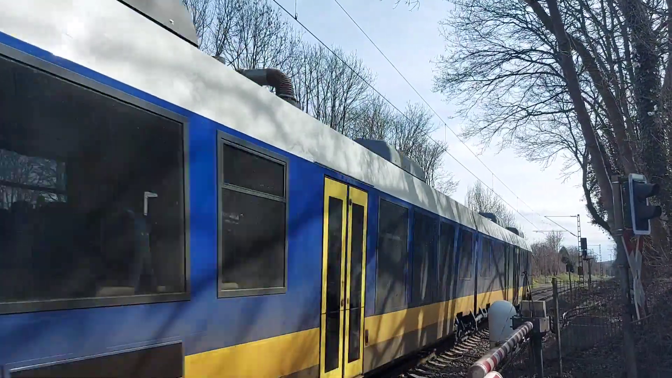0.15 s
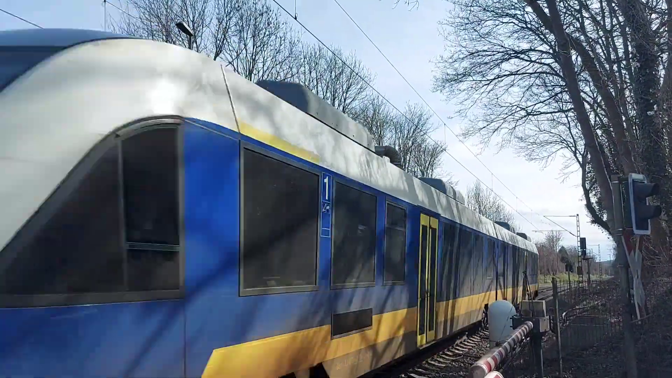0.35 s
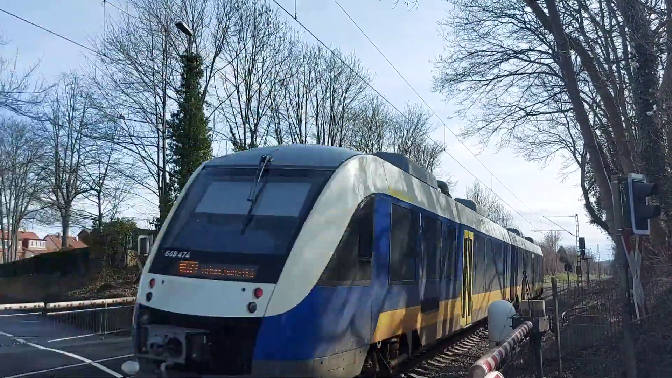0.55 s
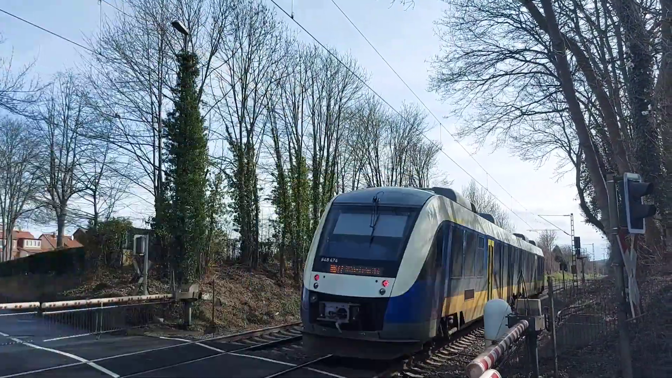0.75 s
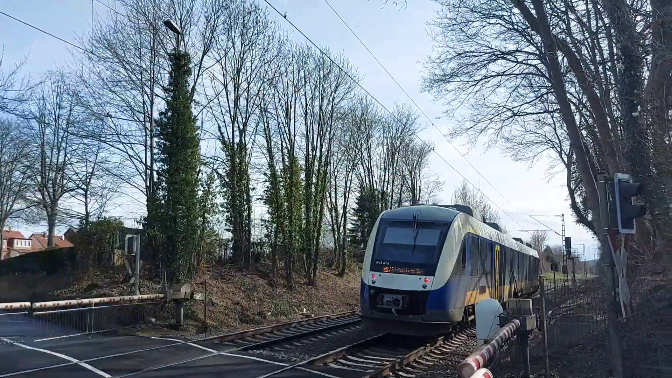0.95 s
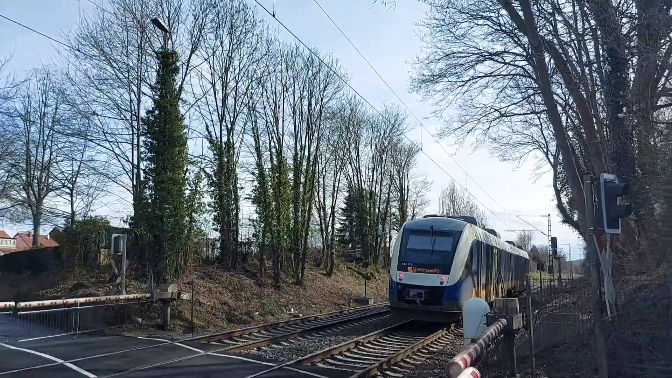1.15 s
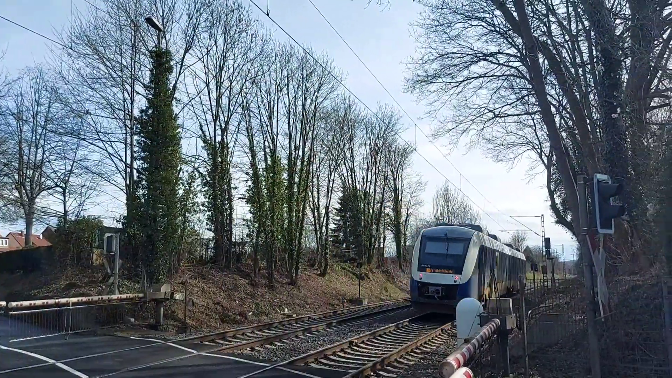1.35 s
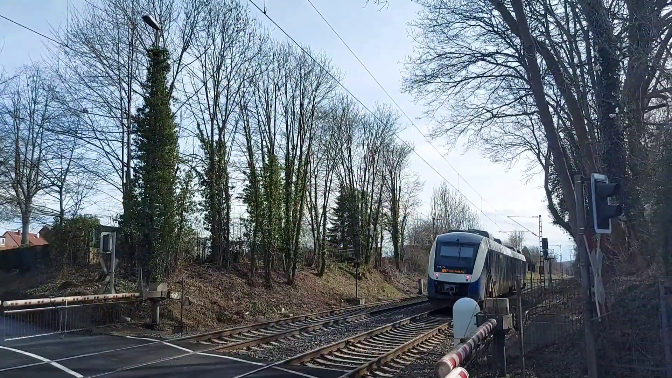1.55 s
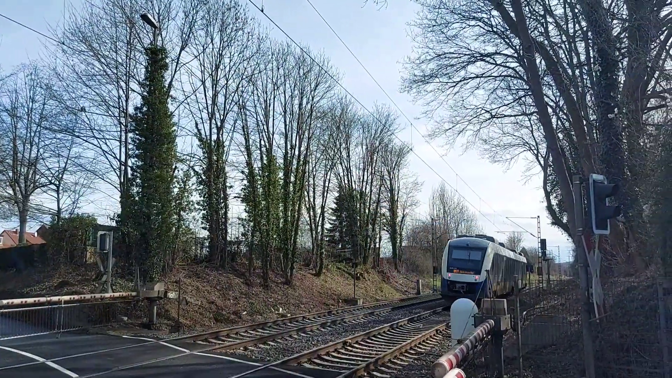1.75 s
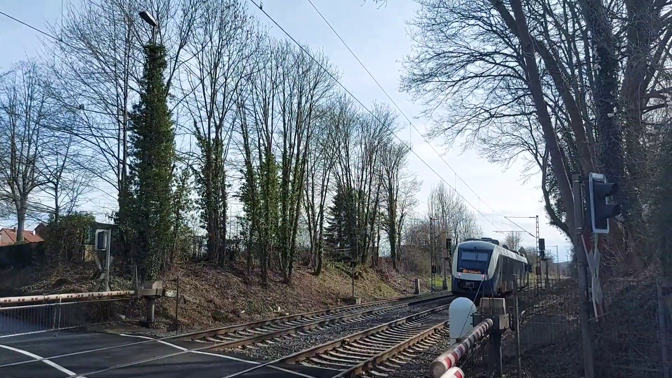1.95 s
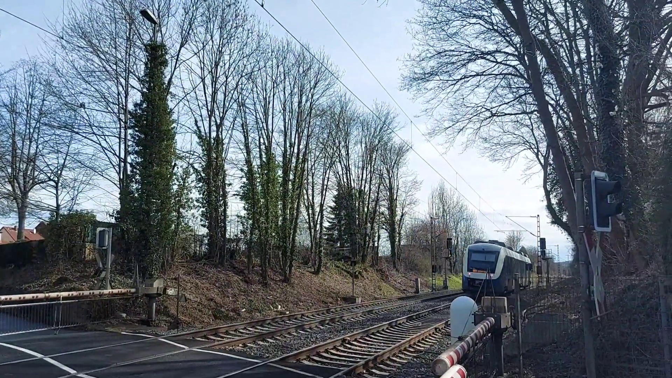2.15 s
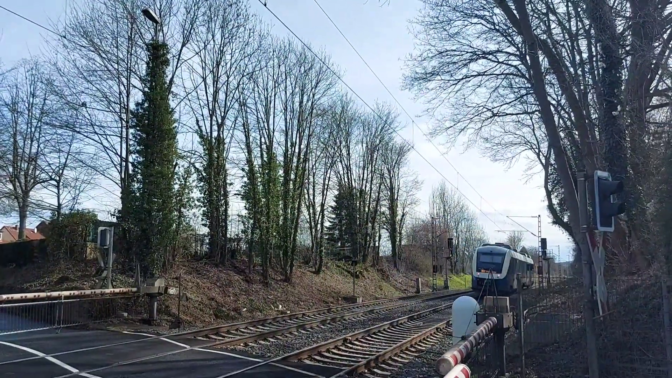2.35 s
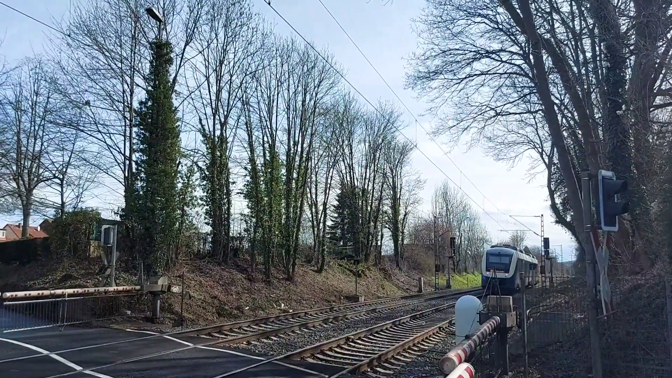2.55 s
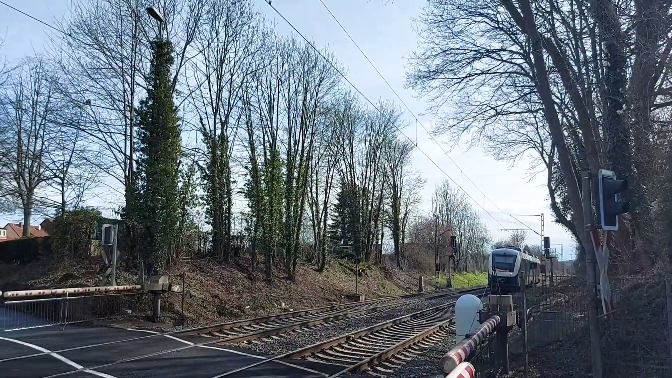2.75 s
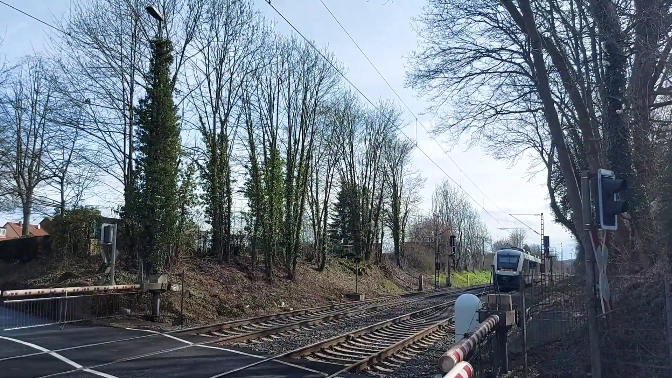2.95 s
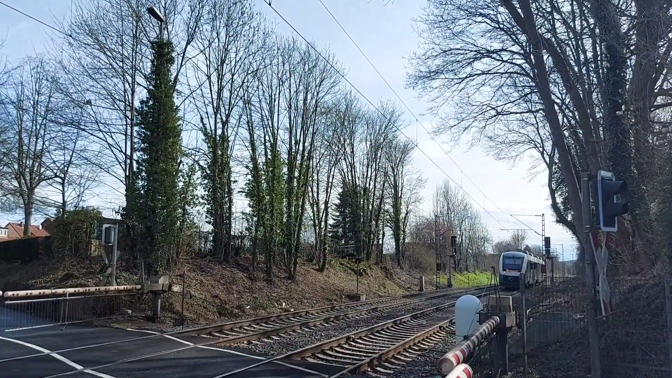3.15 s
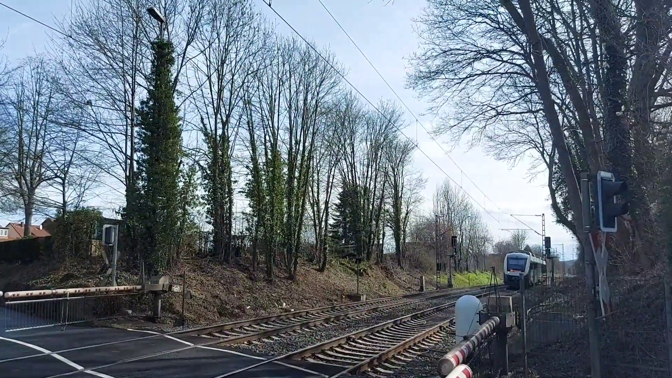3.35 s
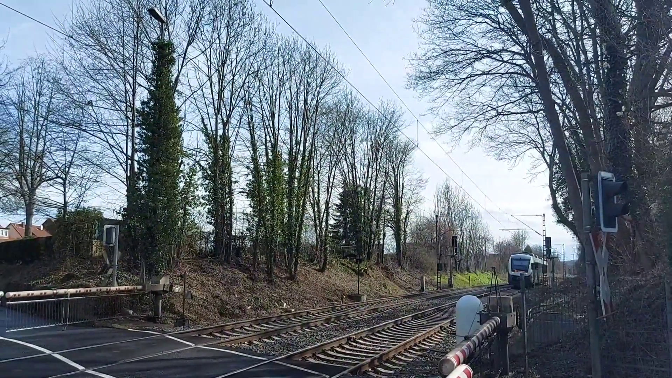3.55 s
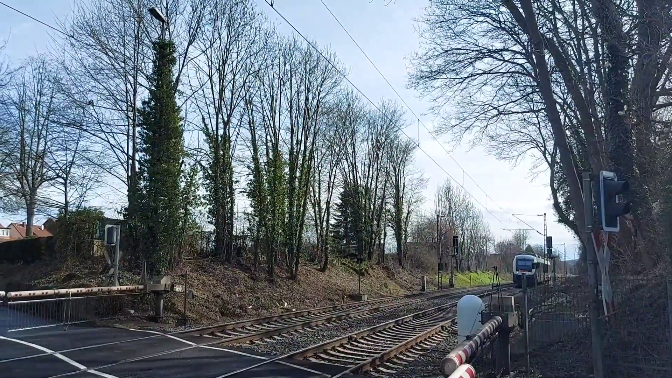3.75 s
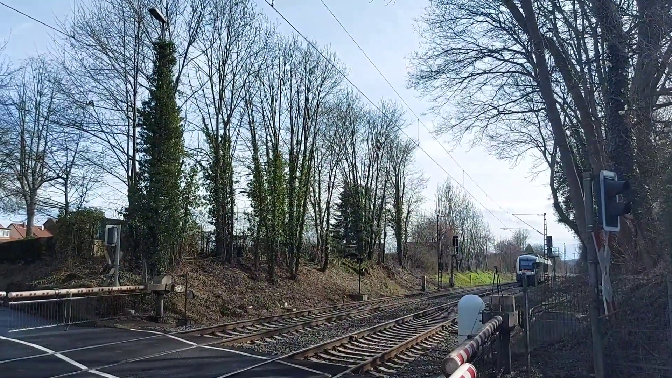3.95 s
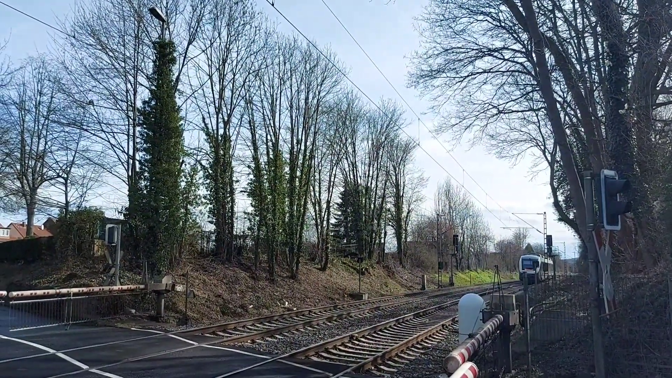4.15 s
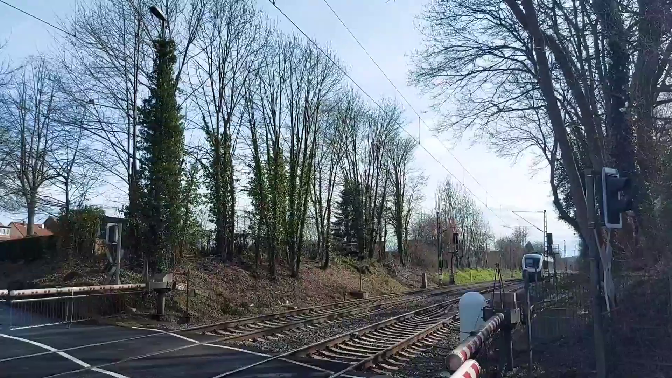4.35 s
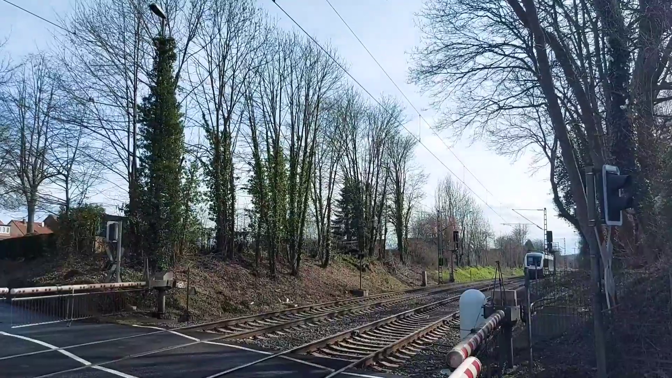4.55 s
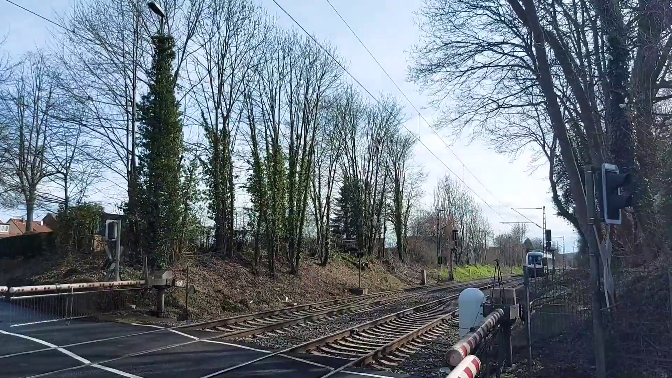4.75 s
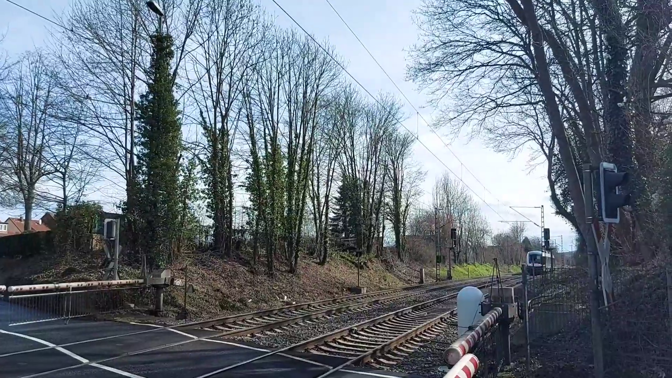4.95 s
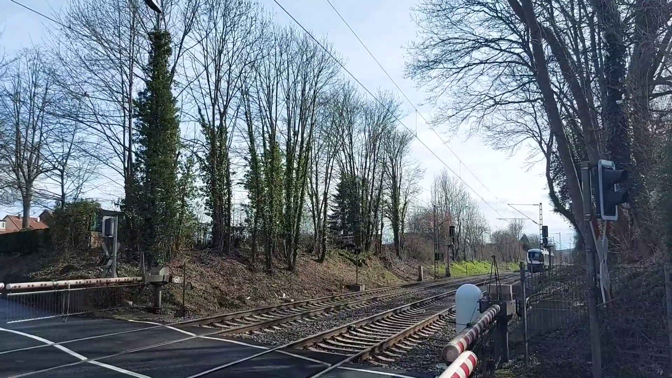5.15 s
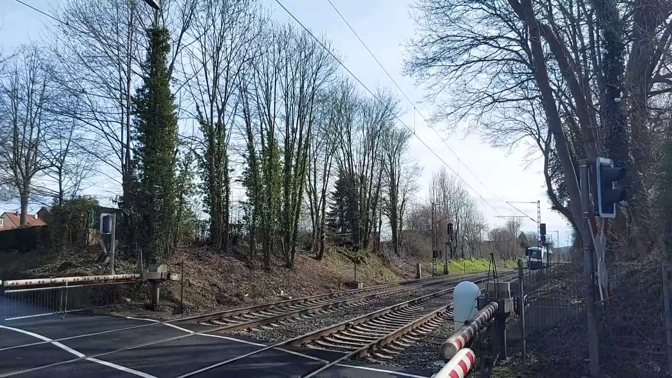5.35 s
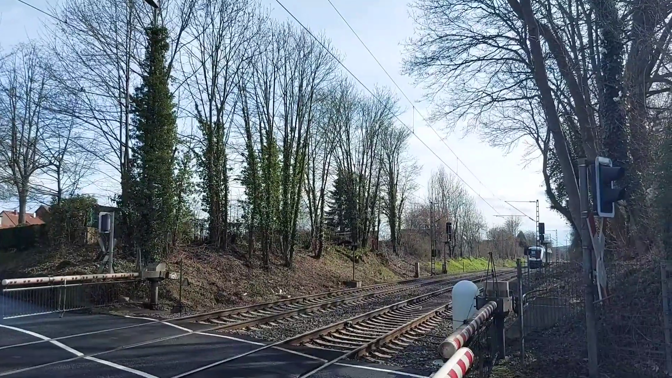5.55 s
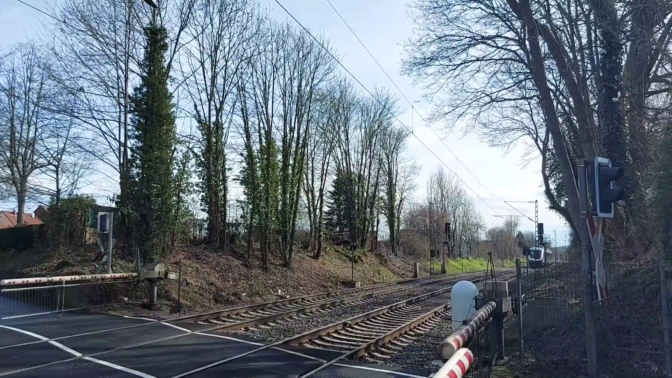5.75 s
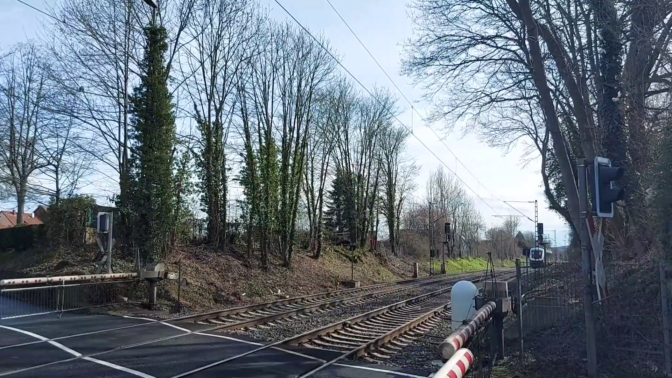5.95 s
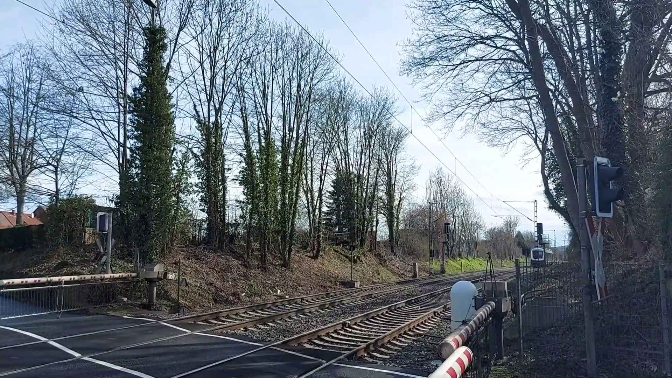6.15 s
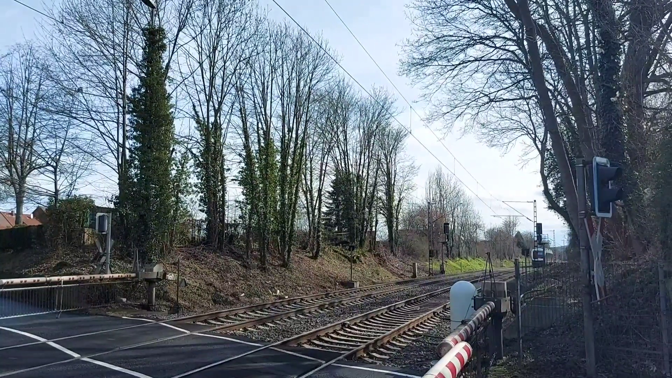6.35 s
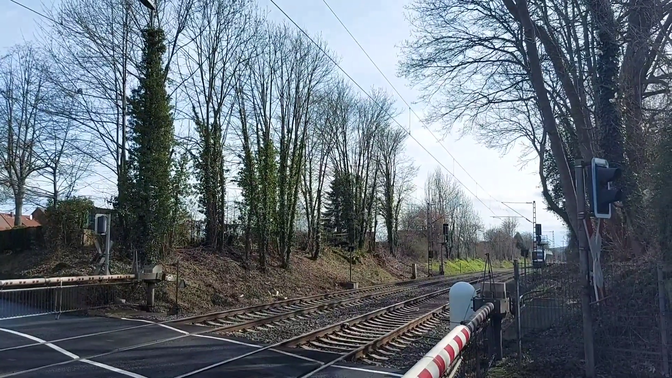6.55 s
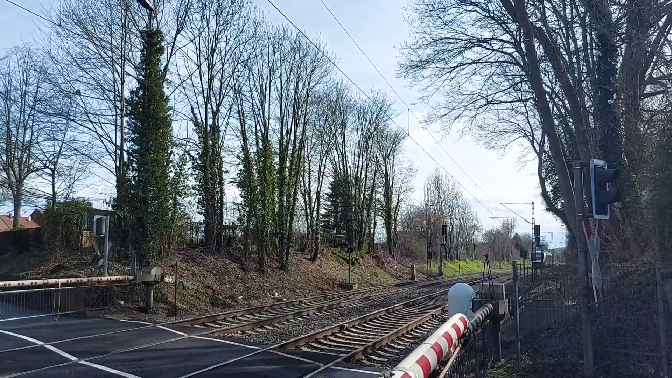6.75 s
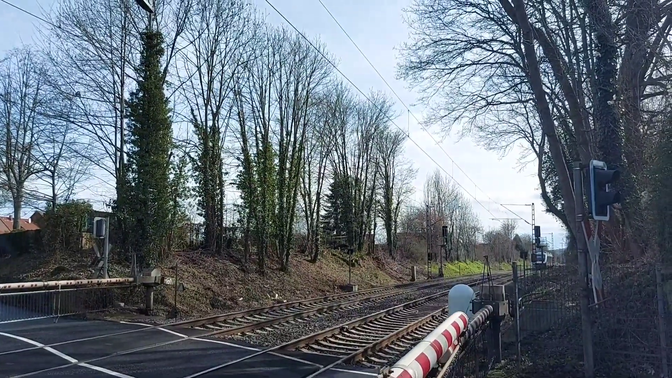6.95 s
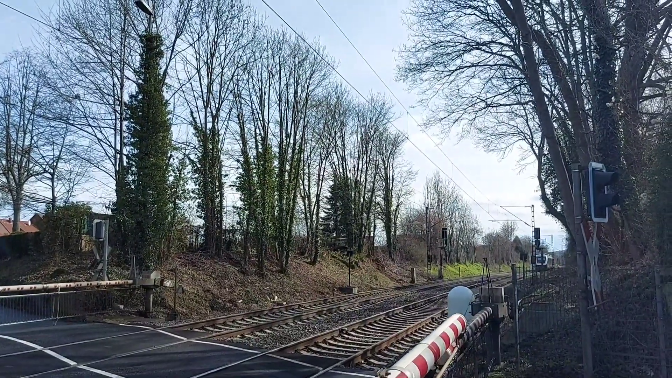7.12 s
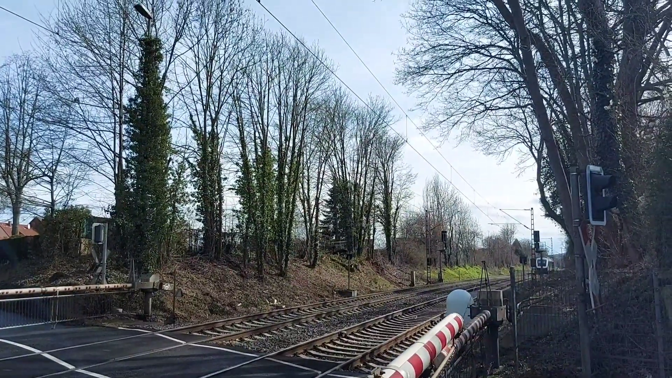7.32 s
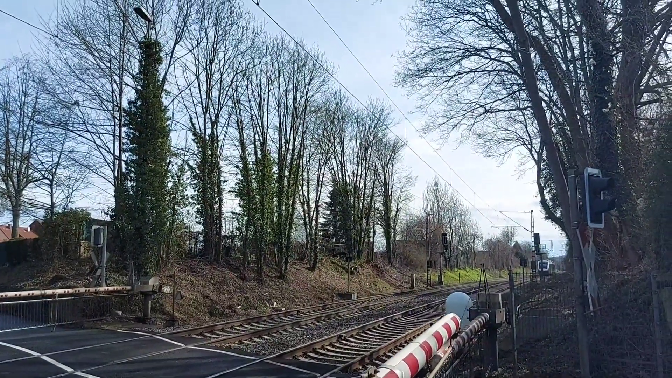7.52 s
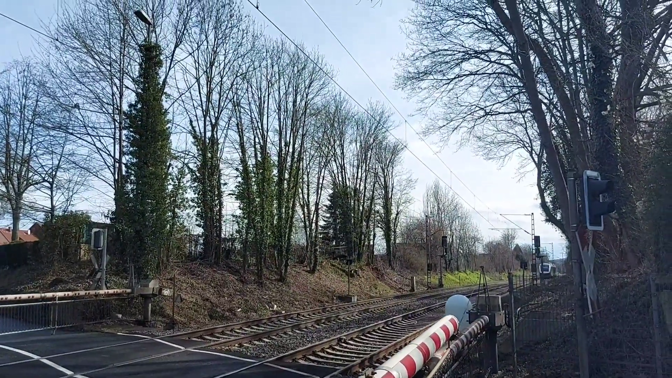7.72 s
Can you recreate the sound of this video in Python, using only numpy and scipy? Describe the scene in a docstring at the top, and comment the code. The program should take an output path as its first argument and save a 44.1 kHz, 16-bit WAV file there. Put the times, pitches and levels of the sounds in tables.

```python
"""Train tail at a level crossing

The tail of a short passenger train rushes past and its roar, coloured noise, fades down the line; wheels sing
as wavering tones. A waiting car idles as a stack of engine orders and birds sing gliding notes in the trees.
Then the barrier drive clinks free and the boom rattles up: blows and scrapes ringing resonances.
A phone with two spaced microphones stands by the barrier."""
import sys
import numpy as np
from scipy import signal
from scipy.fft import rfft, irfft
from scipy.io import wavfile
from scipy.ndimage import uniform_filter1d

SR = 44100
rng = np.random.default_rng(int(sys.argv[2]) if len(sys.argv) > 2 else 0)


def voltage_ratio(level):
    """Linear amplitude factor for a level in decibels (scalar or array-like)."""
    return 10 ** (np.asarray(level, float) / 20)


def waveform_to_disk(signal):
    """Save audio, clipped to [-1, 1], as 16-bit WAV at the path in sys.argv[1]."""
    frames = np.transpose(np.atleast_2d(signal))
    scaled = np.clip(frames, -1, 1) * 32767
    samples = np.round(scaled).astype(np.int16)
    wavfile.write(sys.argv[1], SR, samples)


N = 347490

LIFT_S, LIFT_END_S = 6.25, 7.05  # the boom lifts between these times
BREAKUP_DB = 2.5  # how far wavering tones swell and drop out


def roar():
    """Wheel and rail noise, frame by frame: colour dulls with distance, bands flicker, the direction swings."""
    # rolling roar before swell, hiss and flicker: start_s, rumble_db, rail_drone_db, treble_db
    roll_levels = [(0, -20, -28.5, -25), (.35, -27.5, -27.5, -28), (.63, -30.5, -35.5, -34.5),
                   (.77, -39, -43, -38), (1.15, -39, -45.5, -42), (1.5, -41.5, -50, -44),
                   (2.1, -38.5, -44.5, -43), (2.6, -47, -45.5, -45), (3.2, -46, -44, -45.5),
                   (3.85, -49, -48, -48.5), (4.6, -49.5, -50, -50), (5.8, -49.5, -51.5, -50.5),
                   (7.88, -49, -52.5, -50)]
    # bands of those three levels: low_hz, high_hz
    roll_bands = [(45, 200), (550, 1000), (1500, 5000)]
    # relative colour with the train alongside: pitch_hz, level_db (per Hz)
    near_colour = [(29, -33), (50, -5.5), (96, -3), (223, -10), (270, -3), (397, -11.5), (690, -12.5),
                   (1200, -15.5), (2140, -19), (2860, -19.5), (3150, -18), (3550, -22.5), (5200, -29),
                   (6800, -36), (13700, -39), (15800, -36)]
    # relative colour down the line: pitch_hz, level_db (per Hz)
    far_colour = [(29, -33), (50, 23), (72, -12), (103, 1.5), (148, -2.5), (188, -10), (369, -11.5),
                  (481, -20.5), (674, -16.5), (1040, -26), (1900, -27.5), (2660, -35), (4000, -33.5),
                  (5090, -39.5), (6200, -42.5), (8300, -42.5), (9600, -49.5), (12000, -46), (15800, -52)]
    # resonances of bogie, rail and wheels: pitch_hz, width_hz, alongside_boost_db, gone_boost_db
    train_modes = [(98.2, 20.3, 7, 19), (300, 33, 0.5, 0), (690, 88, 5, 1), (1890, 19, 7, 11.5),
                   (2146, 280, 9, 6), (2480, 110, 7, 6), (4100, 490, 7, -0.5), (11560, 1100, 6.5, -0.5)]
    # sound power common to both microphones: pitch_hz, share (0-1)
    likeness = [(60, 0.9), (300, 0.97), (800, 0.76), (1500, 0.35), (3000, 0.08), (6000, 0), (15000, 0.06)]
    tail_s, dulls_s = 0.87, 1  # the tail has passed; time constant of the turn from near to far colour
    lag_near_ms, lag_far_ms, swing_s = -0.47, 0.3, 0.61  # left lag as the loudest part moves down the line
    bogie_s, bogie_width_s, bogie_hz, bogie_db = 0.5, 0.4, 317, 7.5  # last bogie passes with a low-mid swell
    hiss_db, hiss_fade_s, hiss_hz = 6.5, 0.39, 6040  # extra air hiss at the start
    hop = 256  # samples
    frames = dict(nperseg=4 * hop, noverlap=3 * hop)

    hz, t, grain = signal.stft(rng.standard_normal((3, N)), SR, **frames)
    gone = 1 - np.exp(-np.maximum(t - tail_s, 0) / dulls_s)
    near, far = log_curve(near_colour, hz), log_curve(far_colour, hz)
    for mode_hz, width_hz, near_db, far_db in train_modes:
        bump = 1 / (1 + (2 * (hz - mode_hz) / width_hz) ** 2)
        near = near + near_db * bump
        far = far + far_db * bump
    colour = np.outer(near, 1 - gone) + np.outer(far, gone)

    # lift each band of the colour to its level, blending between band centres
    s, *band_db = np.transpose(roll_levels)
    power = voltage_ratio(2 * colour) / len(hz)
    lift = [np.interp(t, s, db) - 10 * np.log10(power[(hz >= low) & (hz < high)].sum(axis=0))
            for db, (low, high) in zip(band_db, roll_bands)]
    centre = np.log([np.sqrt(low * high) for low, high in roll_bands])
    share = np.array([np.interp(np.log(hz + 1), centre, row) for row in np.eye(len(centre))]).T

    bogie_colour = np.exp(-np.log2((hz + 1) / bogie_hz) ** 2 / 1.1)
    bogie = bogie_db * np.outer(bogie_colour, np.exp(-((t - bogie_s) / bogie_width_s) ** 2))
    hiss_colour = 1 / (1 + (hiss_hz / (hz + 1)) ** 4)
    hiss = hiss_db * np.outer(hiss_colour, np.exp(-(t / hiss_fade_s) ** 2))
    third = np.clip(3 * np.log2((hz + 1) / 40), 0, 26).astype(int)  # third-octave band of each bin
    flicker = 1.93 * walk(9, count=27, size=len(t))[third] + 0.27 * walk(23, count=1, size=len(t))
    gain = voltage_ratio(colour + share @ lift + bogie + hiss + flicker)

    lag_ms = lag_far_ms + (lag_near_ms - lag_far_ms) / (1 + t / swing_s)
    late = np.exp(-2j * np.pi * np.outer(hz, lag_ms) / 1000)
    alike = np.clip(log_curve(likeness, hz), 0, 1)[:, None]
    common = np.sqrt(alike) * grain[0] * np.array([late, np.ones_like(late)])
    both = common + np.sqrt(1 - alike) * grain[1:]
    sound = signal.istft(both * gain, SR, **frames)[1][:, :N]
    return sound * voltage_ratio([[-.3], [.3]])


def singing_wheels():
    """Wheels sing as they pass: short rough tones sinking in pitch as they draw away, with an echo."""
    # wheel tones before the mix: start_s, length_s, pitch_hz, level_db
    wheel_notes = [(.225, 0.094, 3160, -27), (.34, 0.026, 3080, -32.5), (.17, 0.054, 3240, -33),
                   (0.3, 0.053, 2000, -43), (.2, .055, 2160, -30.5), (.19, 0.045, 2800, -34),
                   (.27, 0.054, 3000, -30.5), (.39, 0.077, 2540, -35), (0.59, .07, 1500, -43),
                   (0.63, 0.13, 2060, -46), (.33, 0.23, 4180, -39.5), (0.6, .12, 4050, -45),
                   (0.46, .09, 4830, -43), (0.45, 0.077, 2300, -35), (.66, .08, 2480, -47),
                   (0.17, .07, 2400, -46), (0.01, 0.08, 3300, -35.5), (.13, 0.052, 1900, -33),
                   (0.019, 0.027, 2400, -33), (.2, .03, 2560, -30), (.06, .05, 4350, -38),
                   (0.071, 0.094, 4800, -39)]
    sag_per_s = .15  # pitch decay rate
    wheels = sagging([*wheel_notes, *squeaks(count=130)], sag_per_s, rough=0.17, breakup_db=BREAKUP_DB)
    return voltage_ratio(-8) * pair(wheels, lag_ms=-0.24) + echo(wheels, 0.089, db=1.5)


def squeaks(count):
    """Short squeals at random moments and pitches while the wheels are near; high and late ones are fainter."""
    level_db, end_s, low_hz, high_hz = -41, .7, 1950, 5200  # level_db of the earliest, lowest squeal
    when, length, pitch = rng.random((count, 3)).T
    hz = low_hz * (high_hz / low_hz) ** pitch
    return list(zip(end_s * when, 0.018 + 0.044 * length, hz, level_db - 9 * when - 8 * pitch))


def barrier():
    """Knocks, scrapes and a gritty drag ring the hollow boom, hinge, latch and linkage."""
    # sharp knocks before part gains: start_s, latch_db, weight_db (boom), brightness_db (hinge to linkage)
    knocks = [(.8095, -32.5, -0.5, 3), (1.2336, -24.5, -32, -4.5), (4.066, -33.5, -6, 5),
              (6.1678, -32.5, 18.5, -3), (6.171, -26.5, 0, 6), (6.1740, -10, -2.5, 3), (6.1828, -18, 0, -1),
              (6.2046, -31.5, 11, 1), (6.2176, -21.5, -5.5, 18), (6.526, -44, -14, 5),
              (6.5885, -27, -8, -11.5), (6.6718, -36, -3, -4), (6.682, -31, -5, 0), (6.897, -42, -12, 3),
              (7.05, -39, -8, 1), (7.095, -40, -14, 4), (7.219, -40, -12, 0), (7.5743, -36, -3.5, -3),
              (7.856, -33.5, -4.5, 0)]
    # short scrapes before part gains: the same four columns, contact_ms
    scrapes = [(1.2336, -24, -13, 5, 14), (1.2894, -31, -11, 4, 11), (5.9118, -35.5, 2.5, -5, 10.2),
               (6.1445, -22.5, -3.5, -4, 4.9), (6.1965, -21, -1, 4, 4.3), (6.2175, -23, -8, 12, 4),
               (6.2563, -26.5, -10, -3, 6.9), (6.3235, -32.5, -6, -2, 4.7), (6.4261, -25, -7, 9, 10.3),
               (6.4785, -40, -7, -2, 6.6), (6.5455, -31, -18, -5, 3.5), (6.6318, -38, -18, 6, 3.2),
               (6.662, -27.5, -1.5, -4, 5), (6.6892, -33, -6, 5, 11), (6.735, -25.5, -18, 10, 11),
               (6.8300, -36, -16, 4, 15), (6.865, -44, -12, 14, 4), (6.8796, -33, -12, 1, 2.8),
               (6.9146, -28, -11, -10.5, 4.8), (6.9431, -28.5, -5.5, 3, 16),
               (6.9965, -27.5, -0.5, -11, 6.7), (7.0275, -37, 3, 0.5, 8.3), (7.0945, -35, -18, 5, 4.5),
               (7.1626, -35.5, -3, -4, 5.7), (7.2170, -37, -21, -1, 4.5), (7.233, -40, -18, 4, 4),
               (7.4945, -34, -16, 7, 10)]
    # resonances of the four parts, each before its gain: pitch_hz, width_hz, level_db
    boom_modes = [(228, 160, 0.5), (282, 52, 8), (340, 54, 6.5), (550, 97, 1.5), (730, 88, 4),
                  (920, 125, -2), (1120, 140, -5.5), (1364, 60, -1), (1582, 70, -1)]
    hinge_modes = [(1375, 520, -8), (1670, 240, -2), (1830, 230, 2.5), (2150, 590, -1), (2620, 500, 0)]
    latch_modes = [(3180, 1330, -0.3), (3640, 100, 3), (3950, 170, 0), (4930, 290, 2), (5310, 230, 0),
                   (6630, 270, -1), (6600, 1260, -6.5)]
    linkage_modes = [(7150, 750, 0), (8850, 670, -3), (9850, 700, -10), (10700, 350, 2), (11700, 350, 6),
                     (13000, 370, 9.5), (14000, 500, 1), (15300, 700, 2)]
    # boom hums as it starts to swing: start_s, length_s, start_hz, end_hz, level_db, rough (0-1)
    hum_notes = [(6.225, .09, 512, 498, -41, .3), (6.32, .03, 520, 515, -38, .2)]
    # how far each contact point favours other resonances: spread_db of latch, boom, hinge, linkage
    patchy_db = [5, 2, 4, 6]
    knock_ms = 1.0  # contact time

    blows = contacts([(*row, knock_ms) for row in knocks], rise=0.15, click=3.4, patchy_db=-0.5)
    rubs = contacts([*scrapes, *rattle(count=10)], rise=1.7, click=0, patchy_db=patchy_db)
    latch, boom_push, hinge, linkage = voltage_ratio(10.5) * blows + pivot_drag() + voltage_ratio(22.0) * rubs
    # the heavy boom answers only the slow part of a blow, and is too thin for deep bass
    thud = uniform_filter1d(boom_push, size=9) - uniform_filter1d(boom_push, size=150)
    boom = voltage_ratio(16.5) * ring(thud, boom_modes) + voltage_ratio(12.0) * ring(hinge, hinge_modes)
    boom = boom + drive() + notes(hum_notes, breakup_db=BREAKUP_DB)
    metal = voltage_ratio(-1.5) * ring(latch, latch_modes) + voltage_ratio(3) * ring(linkage, linkage_modes)
    metal = metal + voltage_ratio(-16.5) * latch  # the bare contact is heard too
    near = pair(boom, lag_ms=-0.176) + pair(metal, lag_ms=0.027)
    return near * voltage_ratio([[-.8], [.8]]) + echo(boom, 0.075, db=-8) + echo(metal, 0.094, db=-5.5)


def pivot_drag():
    """The pivot drags while the boom lifts: uneven gritty force on latch, boom, hinge and linkage."""
    level_db, rise_db_s, fall_db_s = -46, 32, 40  # level during the lift before part gains; slopes around it
    t = np.arange(N) / SR
    db = level_db - rise_db_s * np.maximum(LIFT_S - t, 0) - fall_db_s * np.maximum(t - LIFT_END_S, 0)
    catch = voltage_ratio(db + 1.6 * walk(70, count=1, size=N))
    return catch * grit((4, N)) * voltage_ratio([[-1], [-4], [-2], [-17]])


def rattle(count):
    """Small loose scrapes at random moments of the lift and just after, each on its own mix of parts."""
    level_db, spread_db, scrape_ms = -43, 6, 2.6  # before part gains; contact time
    when = rng.random(count)
    size, weight, bright = rng.standard_normal((count, 3)).T
    start_s = LIFT_S + (LIFT_END_S + 0.24 - LIFT_S) * when
    return list(zip(start_s, level_db + spread_db * size, 3 * weight - 12, 4 * bright + 2,
                    np.full(count, scrape_ms)))


def contacts(table, rise, click, patchy_db):
    """Force on the four parts: a first click, then a rough contact that swells in rise x its length and dies."""
    hinge_db, linkage_db = -5, -15.5  # against the latch, before brightness
    push = np.zeros((4, N))
    t = np.arange(int(.12 * SR)) / SR
    rough = grit((len(table), 4, len(t)))
    fifth = 5 * np.log2(1 + np.fft.rfftfreq(len(t), 1 / SR) / 100)  # fifths of an octave
    patches = rng.standard_normal((len(table), 41))
    for (s, db, weight, bright, ms), catch, patch in zip(table, rough, patches):
        i, u = int(s * SR), t / (ms / 1000)
        n = min(len(u), N - i)
        favour_db = np.outer(patchy_db, np.interp(fifth, np.arange(len(patch)), patch))
        catch = irfft(rfft(catch) * voltage_ratio(favour_db), len(t))
        force = np.exp(-u) * (1 - np.exp(-u / rise)) * catch
        force /= np.sqrt(np.sum(force ** 2, axis=1, keepdims=True))
        force[:, 0] = click
        part_db = db + np.array([0, weight, hinge_db - bright, linkage_db + bright])
        push[:, i:i + n] += (force * voltage_ratio(part_db)[:, None])[:, :n]
    return push


def grit(shape):
    """Noise made of uneven little catches, each about a millisecond long."""
    grain_db = 3.0  # how unevenly a rough contact catches
    catches = rng.exponential(size=(*shape[:-1], shape[-1] // 40 + 1))
    catches = np.repeat(catches, 40, axis=-1)[..., :shape[-1]]
    x = rng.standard_normal(shape) * voltage_ratio(grain_db * catches)
    return x / x.std()


def drive():
    """The brake clinks free, then the motor whines on several multiples of its rising speed."""
    # resonances of the brake: pitch_hz, width_hz, level_db (before the clink's own level)
    clink_modes = [(2273, 29, 12), (3240, 80, 5.5), (2040, 61, -4)]
    # whine of the drive taking up load: multiple (of its speed), level_db
    whine_orders = [(1, -46), (6, -49), (9, -49), (12, -52), (15, -62)]
    clink_s, clink_db = 5.921, -6  # the brake lets go
    whine_s, length_s, start_hz, end_hz, rough = 6.025, .115, 328, 340, .12
    t = np.arange(N) / SR - clink_s
    let_go = voltage_ratio(clink_db) * (t > 0) * np.exp(-np.abs(t) / 0.0045) * rng.standard_normal(N)
    whine = notes([(whine_s, length_s, k * start_hz, k * end_hz, db, rough) for k, db in whine_orders])
    return ring(let_go, clink_modes) + whine


def car():
    """Engine orders on one wavering shaft speed; uneven firings make each order swell and shrink."""
    # base level of the idling car: start_s, level_db
    idle_levels = [(1.5, -57), (2.05, -42), (2.9, -42), (3.5, -42)]
    # engine orders: multiple (of half the firing rate), level_db (against the base)
    idle_orders = [(1, -19), (2, 1), (3, -18), (4, -30), (5, -9), (6, -16.5), (7, -59), (8, -13.5),
                   (9, -25), (10, -14), (11, -11), (12, -16.5), (13, -8), (14, -14), (15, -18.5), (16, -20)]
    idle_hz = 28.15  # half the firing rate, on average
    s, db = np.transpose(idle_levels)
    turn = 2 * np.pi * np.cumsum(idle_hz * (1 + 0.0059 * walk(12, count=1, size=N)[0])) / SR
    uneven = walk(11, count=len(idle_orders), size=N)
    phases = 1.21 * walk(9, count=len(idle_orders), size=N)
    tone = sum(voltage_ratio(order_db + min(0.26 * k, 3.2) * swell) * np.sin(k * turn + phase)
               for (k, order_db), swell, phase in zip(idle_orders, uneven, phases))
    return pair(np.sqrt(2) * tone * voltage_ratio(np.interp(np.arange(N) / SR, s, db)), lag_ms=0.4)


def birds():
    """Three singers of gliding notes, each from its own side; the warbler sits deep in the trees."""
    # warbler, before the mix: start_s, length_s, start_hz, end_hz, level_db
    warbler_notes = [(1.834, 0.079, 4250, 3630, -51.5), (1.928, 0.045, 3760, 3590, -55),
                     (2.178, .04, 6090, 5500, -59.5), (2.31, .04, 4100, 4000, -55),
                     (2.35, 0.025, 4200, 4260, -50), (2.372, 0.035, 4050, 3860, -47.5),
                     (2.406, .03, 3850, 4100, -48), (2.41, .018, 5250, 5150, -52),
                     (2.462, .015, 3950, 3850, -51), (2.506, 0.04, 4100, 3890, -53),
                     (2.586, 0.07, 4600, 3900, -47.5), (2.65, 0.049, 4014, 3920, -46),
                     (2.695, 0.024, 3950, 4190, -50), (2.722, 0.086, 4470, 4560, -51),
                     (2.745, 0.06, 4050, 3900, -53), (2.83, 0.07, 4750, 4700, -54),
                     (2.867, 0.033, 3800, 3640, -44.5), (2.91, 0.028, 3780, 3630, -47.5),
                     (3.075, 0.05, 4800, 4010, -48), (3.191, 0.052, 5290, 3800, -48.5),
                     (3.31, .04, 3800, 4210, -59), (3.363, 0.053, 6190, 4970, -49.5),
                     (3.375, .03, 4500, 3880, -56), (3.4, 0.13, 5100, 3850, -47.5),
                     (3.709, 0.055, 6180, 4980, -51), (3.75, 0.13, 5000, 3770, -50.5),
                     (5.33, 0.1, 3770, 3700, -65)]
    # tit, every note settling on the same pitch: start_s, length_s, start_hz, level_db
    tit_notes = [(4.32, .075, 4600, -53), (4.72, .11, 4720, -52), (5.13, .15, 4740, -53.5),
                 (5.575, .18, 4700, -55.5), (6.02, .12, 4520, -51)]
    # whistler, sliding down at one pace: start_s, length_s, start_hz, level_db
    whistler_notes = [(1.65, 0.1, 2820, -55), (3.09, 0.24, 2920, -55), (5.085, 0.27, 2980, -55.5),
                      (7.143, 0.045, 2870, -51), (7.19, 0.2, 2770, -52)]
    settle = 1.8  # glides fall fast, then level off (1 = even glide)
    rough, rough_per_octave = 0.17, 0.7  # wide sweeps are harsher
    tit_end_hz, tit_rough = 4453, 0.034
    whistle_sag_per_s = 1.15  # pitch decay rate
    bank_s, bank_db = 0.06, -5  # the far bank throws the song back once

    sweeps = [(*row, rough + rough_per_octave * abs(np.log2(row[2] / row[3]))) for row in warbler_notes]
    warbler = notes(sweeps, settle, early=0.8)
    tit = notes([(s, n, hz, tit_end_hz, db, tit_rough) for s, n, hz, db in tit_notes],
                settle, early=0.58, breakup_db=BREAKUP_DB)
    whistler = sagging(whistler_notes, whistle_sag_per_s, rough=0.02, fade=0.82, breakup_db=BREAKUP_DB)
    trees = echo(warbler, 1.0, db=1) + echo(warbler, 0.25, db=1)
    bank = voltage_ratio(bank_db) * pair(np.roll(warbler, int(bank_s * SR)), lag_ms=-0.21)
    others = pair(tit, lag_ms=-0.14) + pair(whistler, lag_ms=0.019) + echo(tit + whistler, 0.17, db=-2.5)
    return voltage_ratio(-1.0) * pair(warbler, lag_ms=0.517) + trees + bank + others


def sagging(table, per_s, rough, fade=0, breakup_db=0):
    """Notes (start_s, length_s, pitch_hz, level_db) sinking at one pace; fade makes them strongest early."""
    rows = [(s, n, hz, hz * np.exp(-per_s * n), db, rough) for s, n, hz, db in table]
    return notes(rows, early=1 / (1 + fade), breakup_db=breakup_db)


def notes(table, settle=1, early=1, breakup_db=0):
    """Gliding tones; roughness makes pitch and level tremble, breakup_db makes them swell and drop out.

    early under 1 puts the loudest point sooner."""
    out = np.zeros(N)
    tremble, flutter = walk(330, count=2, size=N)
    breakup = breakup_db * walk(45, count=1, size=N)[0]
    shifts = rng.integers(N, size=len(table))  # each note meets its own stretch of the breakup
    for (s, length, start_hz, end_hz, db, rough), shift in zip(table, shifts):
        i, n = int(s * SR), int(length * SR)
        u = np.arange(n) / n
        glide = end_hz * (start_hz / end_hz) ** ((1 - u) ** settle)
        hz = glide * (1 + .11 * rough * tremble[i:i + n])
        level_db = db + 6 * rough * flutter[i:i + n] + np.roll(breakup, shift)[i:i + n]
        shape = np.sqrt(2 * np.sin(np.pi * u ** early)) * voltage_ratio(level_db)
        out[i:i + n] += shape * np.sin(2 * np.pi * np.cumsum(hz) / SR)
    return out


def ring(x, modes):
    """Sum of two-pole resonances, alternating in sign so the valleys stay filled."""
    return sum((-1) ** k * voltage_ratio(db) * signal.lfilter(*signal.iirpeak(hz, hz / width, SR), x)
               for k, (hz, width, db) in enumerate(modes))


def pair(x, lag_ms):
    """One source at both microphones, the left one late by lag_ms."""
    turn = np.exp(-2j * np.pi * np.fft.rfftfreq(N, 1 / SR) * lag_ms / 1000)
    return np.array([irfft(rfft(x) * turn, N), x])


def echo(x, t60, db):
    """Diffuse echo from trees and bank, dying by 60 dB in t60 seconds, different at each microphone."""
    t = np.arange(int(SR * .6)) / SR
    tail = rng.standard_normal((2, len(t))) * np.exp(-np.log(1000) * t / t60) * np.minimum(t / 0.00038, 1)
    tail *= voltage_ratio(db) / np.sqrt(np.sum(tail ** 2, axis=1, keepdims=True))
    return signal.fftconvolve(x[None], tail, axes=1)[:, :N]


def walk(rate, count, size):
    """Rows of random levels that glide to a new value rate times a second."""
    t = np.arange(size) * rate * N / SR / size
    targets = rng.standard_normal((count, int(t[-1]) + 2))
    return np.array([np.interp(t, np.arange(len(row)), row) for row in targets])


def log_curve(table, hz):
    """Value of a (pitch_hz, value) table on a log-frequency axis."""
    f, v = np.transpose(table)
    return np.interp(np.log(hz + 1), np.log(f), v)


def scene():
    """Train, barrier, car and birds together."""
    return roar() + singing_wheels() + barrier() + car() + birds()


def low_pass(x):
    """Removes everything above the highest recorded frequency."""
    return signal.sosfilt(signal.butter(12, 16550, fs=SR, output="sos"), x)


def record(dry):
    """The phone cuts the top above 15850 Hz and the deepest bass below 46 Hz."""
    top_cut = signal.ellip(10, .3, 60, 15850, fs=SR, output="sos")
    bass_cut = signal.butter(4, 46, "high", fs=SR, output="sos")
    mix = signal.sosfilt(bass_cut, signal.sosfilt(top_cut, dry))
    return low_pass(mix)


dry = scene()
out = record(dry)
waveform_to_disk(out)
```